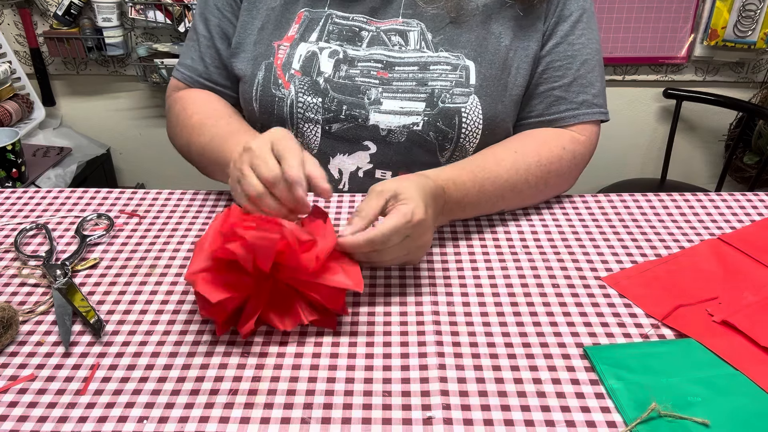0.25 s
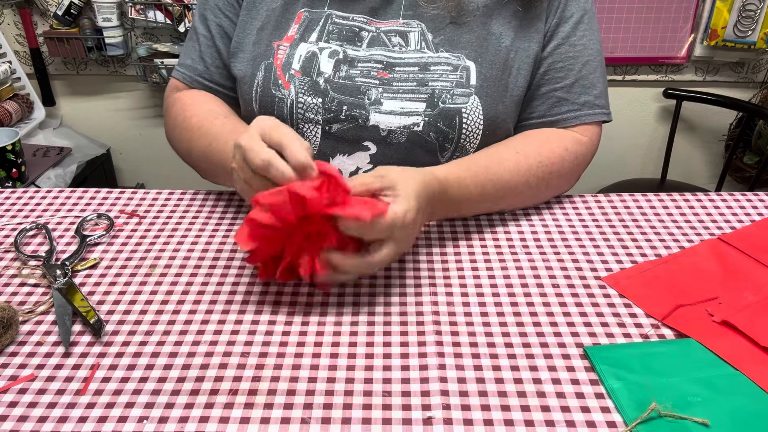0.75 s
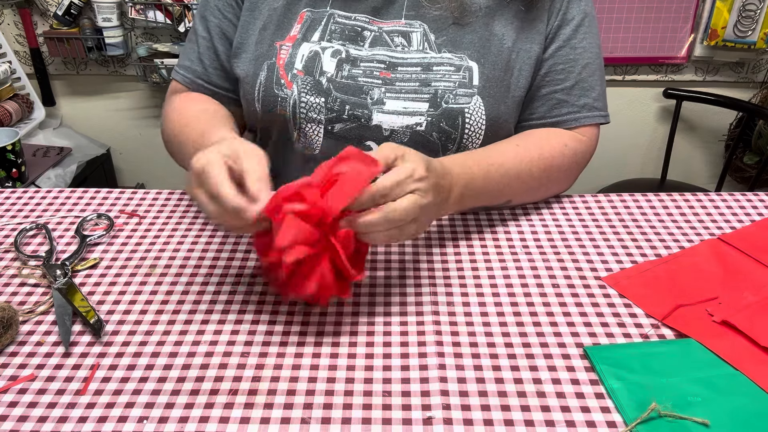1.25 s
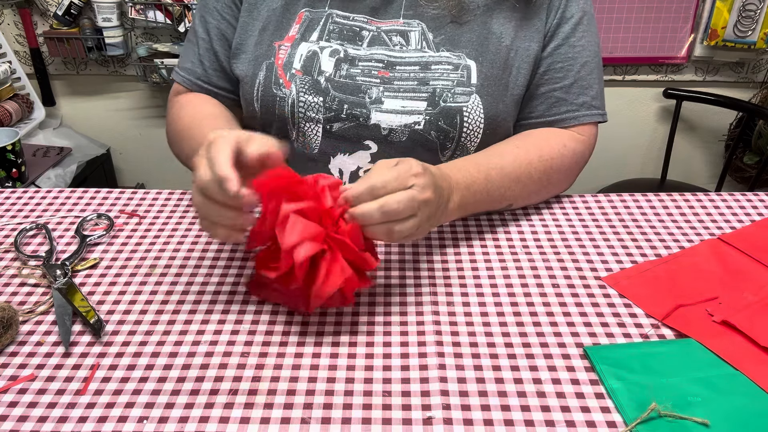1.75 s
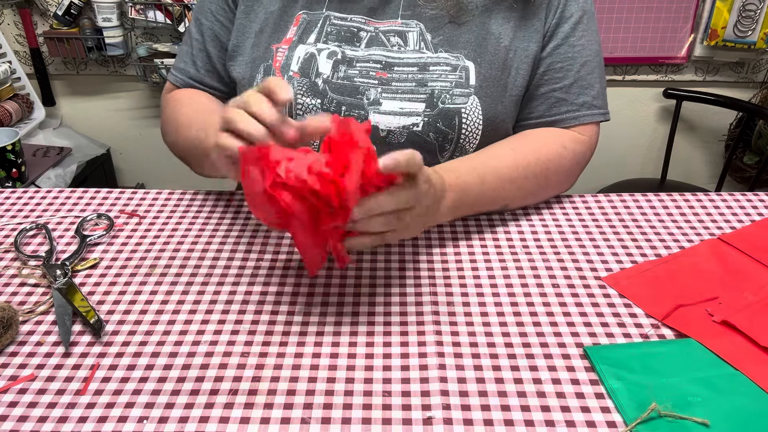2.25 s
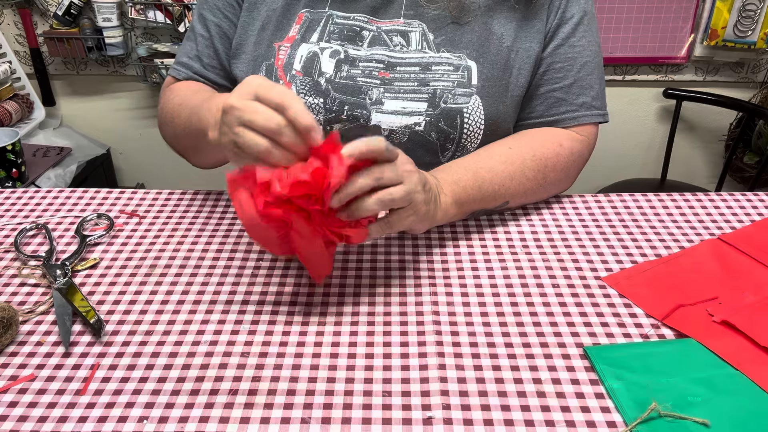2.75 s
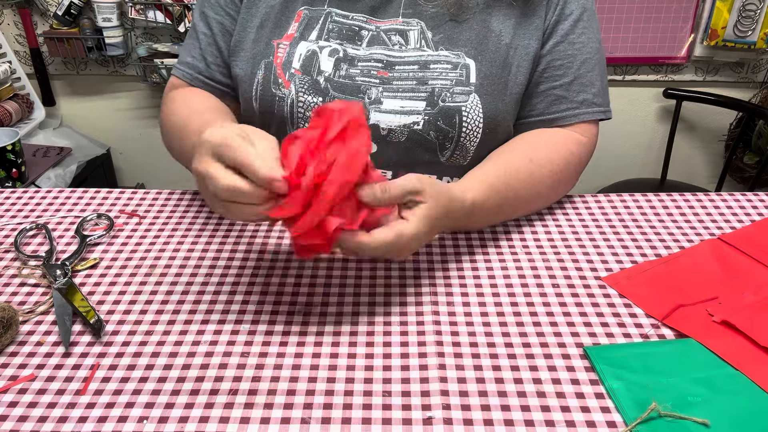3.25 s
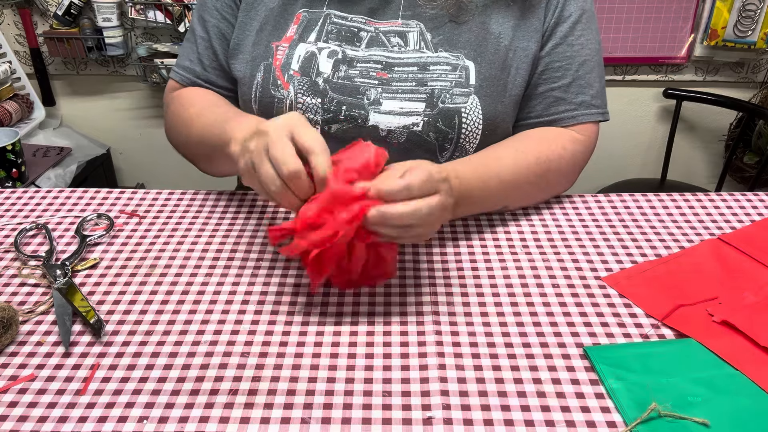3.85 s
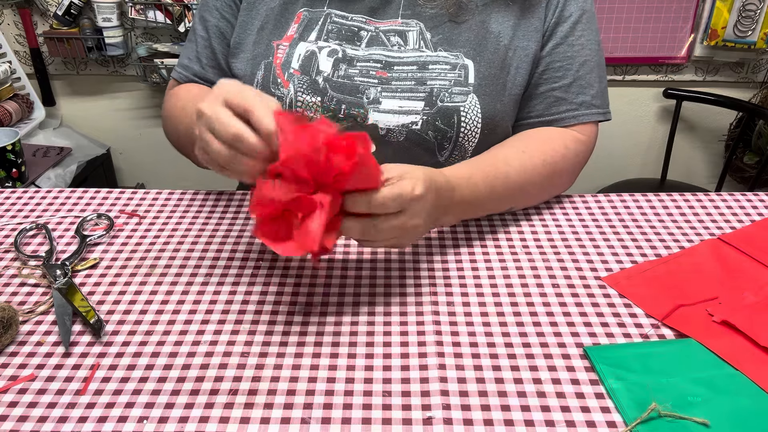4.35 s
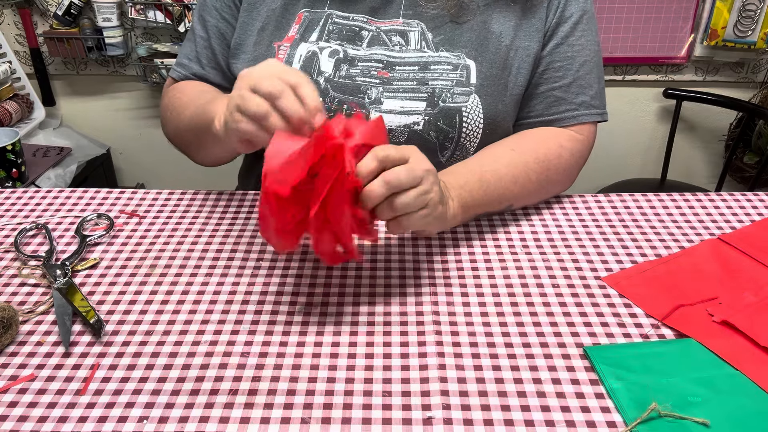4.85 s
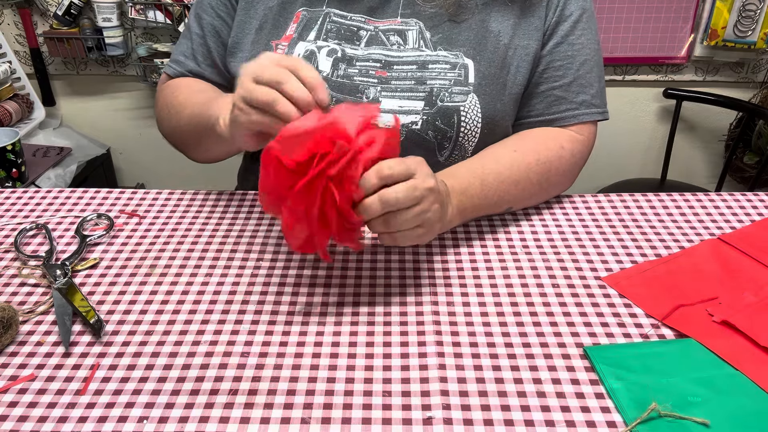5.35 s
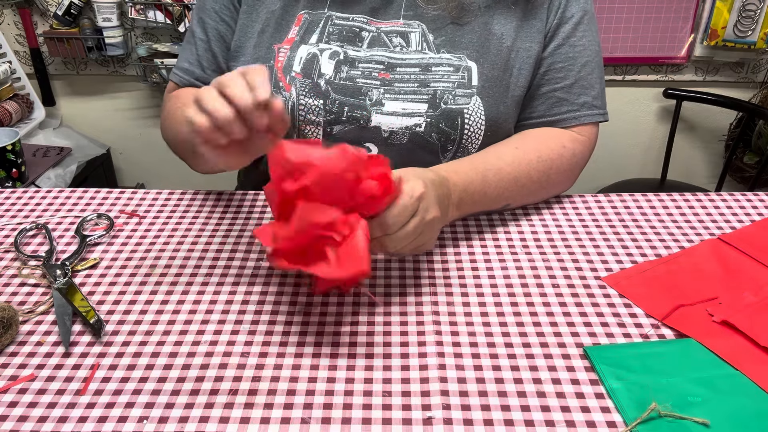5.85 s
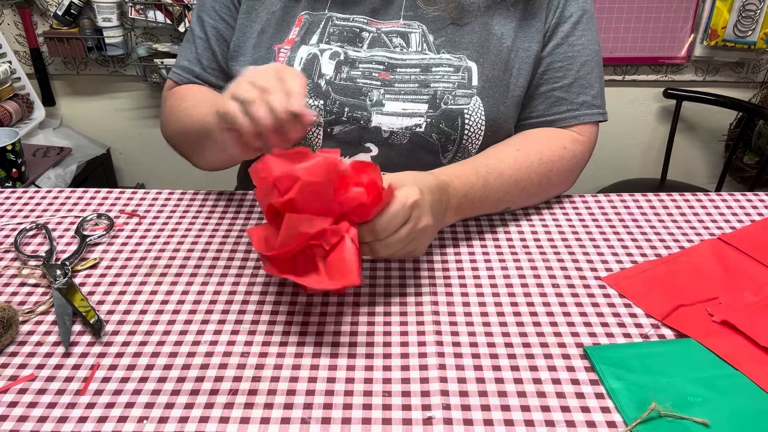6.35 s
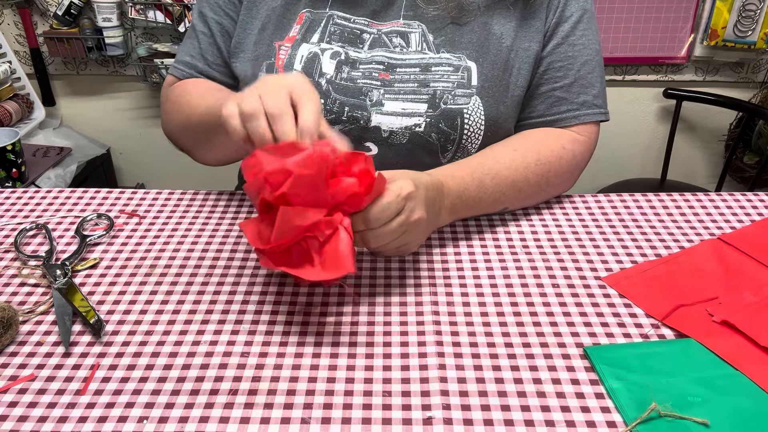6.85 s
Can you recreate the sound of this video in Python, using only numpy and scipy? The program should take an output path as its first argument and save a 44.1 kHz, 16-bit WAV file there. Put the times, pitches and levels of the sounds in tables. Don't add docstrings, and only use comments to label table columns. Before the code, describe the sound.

Close stereo sound of thin crisp plastic being scrunched and fluffed by hand. Short tugs and drags swell and slacken several times a second, bright and fizzy on top, papery and flapping below. Hard snaps cluster near one and a half to two seconds and again after five and a half. Quieter gaps follow near six seconds, then final rustles, over a low steady room rumble.

```python
import sys
import numpy as np
from scipy import signal
from scipy.fft import rfft, irfft, next_fast_len
from scipy.io import wavfile
from scipy.ndimage import uniform_filter1d

SR = 44100
rng = np.random.default_rng(int(sys.argv[2]) if len(sys.argv) > 2 else 0)


def volts(x):
    e = np.asarray(x, float) / 20
    return 10 ** e


def unload_audio(sound):
    columns = np.transpose(np.atleast_2d(sound))
    steps = np.round(np.clip(columns, -1, 1) * 32767)
    wavfile.write(sys.argv[1], SR, steps.astype(np.int16))


N = 313551
PAD = next_fast_len(N + SR // 2)
HZ = np.maximum(np.fft.rfftfreq(PAD, 1 / SR), 1)

# frequency in Hz, level in dB per Hz.
RUMBLE_COLOUR = [(15, -18), (30, -15), (48, 5), (65, 5.5), (85, -3), (120, -3.5), (160, -17.5),
                 (300, -22.5), (600, -48), (1200, -37), (2000, -45), (5400, -36), (9000, -42),
                 (16000, -33.5)]
# frequency in Hz, level in dB rms.
HUM_TONES = [(120.9, -71.5), (63.3, -79), (590, -84.5), (1160, -86), (5400, -91)]

# start in seconds, length in seconds, level in dB, brightness in dB.
DRAGS = [(0.009,0.11,-61,2.5), (0.159,0.069,-65,5.5), (0.581,0.23,-49,2.5), (0.887,0.021,-46.5,-0.5),
         (1.103,0.025,-52,-10), (1.331,0.034,-59.5,1), (1.469,0.051,-47,-1.5), (2.15,0.13,-66,2),
         (2.5,0.097,-75,3), (2.635,0.15,-47,-0.9), (3.209,0.14,-44,0), (3.374,0.12,-50,0),
         (3.742,0.11,-44,1.5), (3.874,0.37,-50.5,3), (4.049,0.017,-48,-1), (4.61,0.056,-63,2.5),
         (4.83,0.082,-51,-4), (4.75,0.054,-47.5,-2), (5.035,0.23,-68,-3), (5.218,0.16,-49,-4.5),
         (5.357,0.025,-50.5,6), (6.036,0.073,-53.5,-1), (6.087,0.097,-44,-4), (6.23,0.041,-53,0),
         (6.473,0.059,-48,-2.5), (6.562,0.11,-46.5,-4), (6.713,0.054,-55.5,-0.5), (6.994,0.066,-49,-2)]
# start in seconds, length in seconds, level in dB, brightness in dB.
GRABS = [
    (0.304, 0.13, -60.5, 3.5),
    (2.283, 0.052, -49, -0.5),
    (5.174, 0.04, -56, -0.5),
    (5.14, 0.03, -64, 2),
    (4.712, 0.03, -63, 3),
    (1.913, 0.016, -45, 3),
    (6.854, 0.04, -57, 0),
    (6.0, 0.02, -68, 3),
]
# peak time in seconds, rise in seconds, fall in seconds, peak level in dB, brightness in dB.
TUGS = [(0.45,0.17,0.46,-54,-2.5), (0.81,0.11,0.083,-43.5,0), (1.115,0.16,0.15,-47.5,1.5),
        (1.504,0.11,0.016,-52.5,4.5), (1.613,0.081,0.037,-40,-0.5), (1.733,0.17,0.048,-58.5,0),
        (1.856,0.071,0.084,-47,1.6), (1.96,0.095,0.024,-48.5,-0.5), (2.072,0.1,0.049,-45,1),
        (2.38,0.086,0.078,-45.5,-1.5), (2.621,0.076,0.045,-52.5,2.5), (2.932,0.18,0.01,-59.5,0),
        (2.988,0.063,0.074,-42.5,1), (3.095,0.038,0.062,-45.5,3.5), (3.64,0.21,0.22,-49,2),
        (4.353,0.081,0.11,-43.5,-1), (4.525,0.043,0.062,-51,3), (4.97,0.031,0.033,-45.5,-0.5),
        (5.613,0.0025,0.07,-49.5,-4), (5.656,0.022,0.044,-40.5,-5), (5.796,0.066,0.017,-53,2.5),
        (5.879,0.075,0.053,-65.5,-1.5), (6.35,0.037,0.039,-67,-8), (6.96,0.086,0.036,-41,-2),
        (0.27,0.03,0.025,-78.5,12), (0.965,0.011,0.032,-64,5), (1.42,0.03,0.03,-57,3),
        (2.83,0.018,0.05,-68,-6), (3.15,0.018,0.017,-57,-3), (3.75,0.052,0.023,-46.5,6),
        (3.805,0.05,0.035,-41.5,0.5), (4.29,0.015,0.03,-67,1), (4.85,0.03,0.058,-54.5,4),
        (5.56,0.11,0.026,-76.5,-3), (6.79,0.02,0.033,-65.5,-5), (6.905,0.03,0.02,-46,-2),
        (7.09,0.02,0.03,-64,-5)]
# time in seconds, flap level in dB against the crackle.
FOLDS_OVER_TIME = [(0, -8), (.3, -5.5), (.6, 1.5), (1, -2.5), (1.4, -4), (1.8, 0), (2.2, -5), (2.6, -2),
                   (3, -2.5), (3.4, -2), (3.9, -1.5), (4.4, -2.5), (4.798, -3), (5.301, -2), (5.7, -3.5),
                   (6.1, -5), (6.6, -7.5), (7.11, -1.5)]
# time in seconds, pleat level in dB against the crackle.
PLEATS_OVER_TIME = [(0, -16), (.32, -15), (.6, -10), (1.12, -6.5), (1.45, -12), (1.95, -10), (2.3, -10),
                    (2.7, -11), (3.17, -12), (3.66, -12.5), (4.1, -10), (4.55, -11), (5.0, -12.5),
                    (5.4, -14), (5.75, -11), (6.12, -8.5), (6.58, -8.5), (7.11, -10.5)]

# frequency in Hz, level in dB per Hz.
FLAP_COLOUR = [(110, -9), (200, -9.5), (330, -3), (540, 1), (800, -4), (1100, -4.5), (1800, -22.5)]
PLEAT_COLOUR = [(600, -26), (1000, -3.5), (1500, 1), (2100, -1.5), (2700, -8.5), (3500, -40)]
CRACKLE_COLOUR = [(500, -27), (1000, -15.5), (1500, -11.5), (2200, -6), (3000, 2), (4000, -1.5), (5200, -2),
                  (8000, -29.5)]
FIZZ_COLOUR = [(3000, -19), (4200, -9.5), (5200, -3.5), (6500, 2.5), (8000, 4.5), (10000, -2.5),
               (11500, -10), (14000, -8.5)]
SHEEN_COLOUR = [(8000, -16.5), (10500, 0), (12000, -6.5), (14000, 4), (15800, -2), (17000, -10)]

# time in seconds, peak in dB, pitch in Hz, wide crack in dB against the ring.
SNAPS = [(0.304, -57, 6150, 0), (0.3282, -40, 2950, -4), (0.4359, -34.5, 7200, -12),
         (0.7942, -32, 2980, -15), (1.276, -29.5, 3870, 2), (1.4656, -50, 2600, 6),
         (1.5542, -39, 2980, -10), (1.6105, -24.5, 3330, -21), (1.726, -46, 6020, 6),
         (1.7936, -30.5, 2580, 3), (1.913, -33, 8500, -23), (1.9533, -24.5, 1500, 1),
         (2.2835, -33.5, 4360, -1), (2.705, -36, 3020, -3), (2.9178, -38, 7320, -1.5),
         (3.0907, -41, 7630, -7), (3.2126, -44, 2660, 11), (3.648, -26.5, 7570, 7), (4.0402, -50, 3200, -4),
         (4.711, -45, 6300, -15), (0.786, -33, 3000, 3), (5.138, -39.5, 8800, -15), (5.369, -33, 3900, -6),
         (5.6186, -26, 3930, -6), (5.6512, -30, 4400, -9), (5.9993, -64, 7370, 2), (6.023, -35, 4420, 11),
         (6.0862, -46, 7400, 1), (6.47, -52, 2920, 7), (6.8553, -52, 1940, 8)]
# time in seconds, peak in dB, pitch in Hz.
TICKS = [(0.4743, -32, 3000), (1.5723, -26, 3130), (1.9118, -21, 8500), (3.157, -40, 7500),
         (4.2857, -33, 8170), (5.1736, -40, 4000), (5.2164, -33, 3300), (5.7448, -33, 2600),
         (6.3934, -50, 3000), (0.381, -36, 3600), (0.518, -41, 3300), (5.3128, -33, 3930),
         (6.34, -58, 2500), (6.4248, -58, 4000), (6.4377, -54, 3000), (6.508, -39, 7000),
         (0.3765, -42, 6910), (0.6255, -34, 6500), (0.9567, -42, 7900), (0.972, -43, 7000),
         (1.4726, -37, 8700), (1.506, -34, 2500), (1.6018, -29, 2820), (1.7774, -43, 2380),
         (1.8347, -36, 2950), (2.3196, -36, 2000), (2.365, -36, 2600), (2.487, -56, 5000),
         (2.9766, -31, 8090), (3.105, -30, 7600), (3.232, -31, 2800), (3.289, -32, 3500),
         (3.5838, -40, 4410), (3.7484, -26, 4270), (3.80, -28, 3300), (4.3415, -34, 3680),
         (4.537, -38, 4000), (4.9536, -39, 3580), (5.325, -37, 2300), (5.6082, -38, 2960),
         (5.691, -37, 2500), (5.926, -58, 7500), (6.128, -35, 2500), (6.157, -37, 3500), (6.561, -38, 2710),
         (6.762, -49, 5500), (6.908, -37, 2600), (7.02, -39, 3500), (1.905, -37, 4000), (1.9545, -27, 2200),
         (3.6491, -31, 3000), (1.62, -27, 1300), (6.96, -31, 2500), (0.3282, -40, 1500)]
# time in seconds, peak in dB, pitch in Hz, ring in cycles.
KNOCKS = [(0.57, -39, 214, 7), (0.553, -31, 226, 7.2), (0.625, -33, 395, 6.1), (0.853, -35, 580, 11),
          (1.038, -41, 420, 5.1), (1.27, -38.5, 686, 5.2), (1.466, -40.5, 910, 30), (1.572, -39, 990, 8),
          (1.615, -40, 180, 2.6), (1.615, -28, 453, 6.3), (1.794, -41.5, 380, 11), (1.913, -39.5, 377, 11),
          (1.95, -38.5, 370, 8.1), (2.319, -38.5, 730, 13), (2.37, -41, 560, 10), (2.775, -37.5, 522, 9.3),
          (2.991, -35, 550, 33), (3.093, -39, 940, 17), (3.225, -34, 970, 17), (0.81, -37, 420, 9.1),
          (3.898, -37.5, 650, 18), (3.957, -37.5, 506, 5.8), (4.35, -37.5, 706, 14), (4.753, -43, 480, 21),
          (5.214, -39, 580, 20), (5.387, -38.5, 547, 18), (5.619, -32.5, 510, 11), (5.653, -37, 360, 8.7),
          (0.6, -43, 450, 8), (6.902, -49, 460, 11), (0.473, -46, 525, 7.2), (0.514, -45, 999, 8),
          (0.582, -42, 330, 5.8), (0.674, -37, 1090, 10), (0.77, -42, 560, 8.4), (0.795, -36.5, 615, 7.8),
          (0.82, -37, 700, 14), (0.9, -40, 600, 8), (1.125, -39, 1120, 14), (1.504, -36.5, 554, 16),
          (1.723, -42.5, 418, 14), (1.955, -36.5, 1280, 11), (2.66, -42, 950, 10), (3.204, -44, 1130, 8),
          (3.323, -47, 533, 10), (4.05, -40, 600, 14), (5.338, -42, 573, 18), (5.365, -40, 520, 13),
          (6.255, -48, 600, 11), (7.085, -54, 407, 8)]

# frequency in Hz, lead in radians.
PORT_LEAD = [(60, 0), (450, -.45), (1800, -.2), (2300, -.3), (3000, -1), (4200, -1.4), (6000, -1.6),
             (7400, -.3), (8500, .3), (9700, 2.7), (11000, 3.4), (11900, 6), (13100, 6.55), (14500, 9),
             (15800, 9.6)]
# frequency in Hz, share from 0 to 1.
DIRECT_SHARE = [(60, .94), (300, .87), (1500, .85), (2300, .87), (3000, .68), (5000, .42), (6800, .65),
                (7600, .9), (10000, .92), (12500, .91), (15000, .88)]
# frequency in Hz, left over right in dB.
PORT_TILT = [(60, 1.5), (110, -2.5), (200, -1), (380, 0.5), (700, -1.5), (1290, -2.5), (2380, 1),
             (4400, -3), (8120, -2), (15000, 0.5)]

BAND_EDGES = np.r_[40:96:8, 96:144:12, 144, 160, 176, 196, 216, 240, 264, 292, 320:737:32]
# frequency in Hz, gap in dB.
WEAKER_GAP = [(1500, 15), (2300, 11), (4000, 8), (7000, 8), (9000, 7), (11500, 8), (14000, 7), (15500, 9)]
# frequency in Hz, level in dB against the band.
FAINT_LIMIT = [(800, -30), (1400, -8), (2000, -5.5), (2600, -4.8), (6000, -4.5), (7500, -6), (9000, -5.5),
               (11500, -5), (12500, -7), (15000, -6.5)]


def rms_one(x):
    return x / np.sqrt(np.mean(x ** 2) + 1e-20)


def at_hz(points, hz=HZ):
    points = np.array(points)
    return np.interp(np.log(hz), np.log(np.maximum(points[:, 0], 1)), points[:, 1])


def over_time(points):
    return np.interp(np.arange(N) / SR, *np.transpose(points))


def coloured(x, spectrum):
    bins = rfft(x, PAD)
    centres = np.geomspace(20, SR / 2, 60)
    band = np.searchsorted(centres, HZ).clip(0, len(centres) - 1)
    power = np.bincount(band, abs(bins) ** 2) / np.maximum(np.bincount(band), 1)
    flat = bins / np.sqrt(np.interp(np.log(HZ), np.log(centres), power) + 1e-12)
    one = rms_one(irfft(flat * volts(at_hz(spectrum)), PAD)[:N])
    return np.array([np.roll(one, k * N // 3) for k in range(3)])


def drift(rate):
    r = np.exp(-80 * np.pi * rate / SR)
    noise = rng.standard_normal(N // 40 + 2002)
    slow = signal.lfilter([1], [1, -2 * r, r * r], noise)[2000:]
    return np.interp(np.arange(N) / 40, np.arange(len(slow)), rms_one(slow))


def ring(clicks, hz, cycles):
    r = volts(-60 * hz / (cycles * SR))
    w = 2 * np.pi * hz / SR
    return signal.lfilter([0, np.sin(w)], [1, -2 * r * np.cos(w), r * r], clicks + 1e-18)


def room_tone():
    air_db = -61.53 + 0.42 * drift(15.0)
    air = volts(air_db) * coloured(rng.standard_normal(N), RUMBLE_COLOUR)
    t = np.arange(N) / SR
    hum = 0
    for hz, db in HUM_TONES:
        level = np.sqrt(2) * volts(db + 1.5 * drift(8.9))
        waver = 0.065 * np.sqrt(hz / 60) * drift(17)
        hum = hum + level * np.sin(2 * np.pi * hz * t + waver)
    return air + hum * np.array([[1], [1], [-1]])


def handling():
    attack_s, grab_attack_s, release_s = 0.09, 0.012, 0.13
    rest_db = -85
    shapes = []
    for rows, attack in ((DRAGS, attack_s), (GRABS, grab_attack_s)):
        for s, length, db, bright in rows:
            shapes.append(([s, s + length], [db, db - 3], bright, attack))
    for s, rise, fall, db, bright in TUGS:
        shapes.append(([s - abs(rise), s, s + fall], [db - 12.5, db, db - 9.5], bright, attack_s))

    t = np.arange(0, N + 32, 32) / SR
    power, weighted = volts(2 * rest_db), 0
    for times, levels, bright, attack in shapes:
        times = [times[0] - 2 * attack, *times, times[-1] + 2 * release_s]
        levels = [levels[0] - 120, *levels, levels[-1] - 120]
        part = volts(2 * np.interp(t, times, levels))
        power = power + part
        weighted = weighted + bright * part
    crackle_db = 10 * np.log10(power)
    return over_time([*zip(t, crackle_db)]), over_time([*zip(t, weighted / power)])


def buckles(per_s, clump_db, size_db, patchy_db, low_hz, high_hz, cycles, count):
    born = rng.random(N) < per_s * volts(clump_db * drift(35)) / SR
    strength = volts(size_db * np.minimum(rng.exponential(1, N), 3.6))
    clicks = strength * rng.choice([-1, 1], N) * born
    dealt = rng.integers(0, count, N)
    out = 0
    for k, hz in enumerate(np.geomspace(low_hz, high_hz, count)):
        come_and_go = volts(patchy_db * drift(10.0))
        out = out + ring(clicks * (dealt == k) * come_and_go, hz, cycles)
    return out


def rustle():
    crackle_db, bright_db = handling()
    small = buckles(7000, clump_db=2.5, size_db=3, patchy_db=3.6,
                    low_hz=900, high_hz=9500, cycles=24, count=22)
    tiny = buckles(12000, clump_db=1.5, size_db=2, patchy_db=3.5,
                   low_hz=7300, high_hz=15800, cycles=5.3, count=5)
    broad = buckles(1200, clump_db=2.5, size_db=0, patchy_db=-0.7,
                    low_hz=180, high_hz=1526, cycles=4.8, count=8)

    crackle = coloured(small, CRACKLE_COLOUR)
    pleats = volts(over_time(PLEATS_OVER_TIME)) * coloured(small, PLEAT_COLOUR)
    fizz = volts(1.05 * bright_db - 1.1) * coloured(small + 1.84 * tiny, FIZZ_COLOUR)
    sheen = volts(1.25 * bright_db + 2.0) * coloured(tiny, SHEEN_COLOUR)
    flap_db = over_time(FOLDS_OVER_TIME) - 0.21 * (crackle_db + 49)
    flap = volts(flap_db - 0.4) * coloured(broad, FLAP_COLOUR)

    jerks_db = 0.65 * drift(28) + 0.23 * drift(120)
    return volts(crackle_db + jerks_db - 2.0) * (crackle + pleats + fizz + sheen + flap)


def struck(events, slip_s, level_db, t60):
    span = SR // 10
    out = np.zeros((3, N + SR))
    age = np.arange(span) / SR
    for s, peak_db, hz, cycles, crack_db in events:
        push = rng.standard_normal(span) * age * np.exp(-2 * age / slip_s)
        crack = signal.lfilter([1, -2, 1], [1, -1.6, .64], push)
        body = np.diff(ring(push, hz, max(cycles, 2)), prepend=0)
        one = body / abs(body).max() + volts(crack_db) * crack / abs(crack).max()
        tails = rng.standard_normal((2, span)) * volts(-60 * age / t60)
        tails = tails / np.sqrt(np.sum(tails ** 2) / 2)
        echoes = signal.fftconvolve(tails, one[None], axes=1)[:, :span]
        gain = volts(peak_db + level_db) / (1 + volts(crack_db))
        at = round(s * SR)
        out[:, at:at + span] += gain * np.vstack([one, echoes])
    return out[:, :N]


def crease_snaps():
    events = [(s, db, hz, 5, crack_db) for s, db, hz, crack_db in SNAPS]
    return struck(events, slip_s=0.0013, level_db=3, t60=0.05)


def sharp_ticks():
    events = [(*row, 3, 0) for row in TICKS]
    return struck(events, slip_s=0.0003, level_db=7, t60=0.03)


def finger_knocks():
    events = [(*row, -22) for row in KNOCKS]
    return struck(events, slip_s=0.0056, level_db=-1.5, t60=0.24)


def ports(x):
    bins = rfft(x, PAD)
    share = np.clip(at_hz(DIRECT_SHARE), 0, 1)
    sign = np.array([[1], [-1]])
    direct = np.sqrt(share) * np.exp(.5j * sign * at_hz(PORT_LEAD)) * bins[0]
    scattered = np.sqrt(1 - share) * bins[1:]
    tilt = volts(.5 * sign * at_hz(PORT_TILT))
    return irfft((direct + scattered) * tilt, PAD)[:, :N]


def scene():
    bed = room_tone() + rustle()
    return ports(bed + crease_snaps() + sharp_ticks() + finger_knocks())


def thin_faint_lines(x, jump_db):
    hop, lead = 1024, 1024 - 42
    first = BAND_EDGES[0]
    n, line = np.arange(2 * hop) + .5, np.arange(BAND_EDGES[-1]) + .5
    window = np.sin(np.pi * n / (2 * hop))
    basis = window[:, None] * np.cos(np.pi / hop * np.outer(n + hop / 2, line))

    count = (N + lead) // hop + 2
    both = np.pad([x[0] + x[1], x[0] - x[1]], ((0, 0), (lead, count * hop - N - lead)))
    both = both.reshape(2, count, hop) / 2
    lines = np.concatenate([both[:, :-1], both[:, 1:]], axis=2) @ basis

    widths, band_hz = np.diff(BAND_EDGES), BAND_EDGES[:-1] * SR / (2 * hop)
    band_power = np.add.reduceat(lines ** 2, BAND_EDGES[:-1], axis=2) / widths
    level_db = 10 * np.log10(band_power + 1e-20)
    total_db = 10 * np.log10(np.sum(lines[..., BAND_EDGES[4]:] ** 2, axis=(0, 2)) + 1e-20)
    steady = (abs(np.diff(total_db, prepend=total_db[0])) < jump_db)[:, None]

    weak = (level_db[::-1] - level_db > at_hz(WEAKER_GAP, band_hz)) & steady
    least_db = (level_db.max(axis=0) + level_db) / 2 + at_hz(FAINT_LIMIT, band_hz)
    least = volts(least_db) * steady
    upper = lines[..., first:]
    patch = np.sqrt(uniform_filter1d(upper ** 2, size=3, axis=2).clip(0))
    heard = np.repeat(~weak, widths, axis=2) & (patch > np.repeat(least, widths, axis=2))
    lines[..., first:] = upper * heard

    frames = lines @ basis.T * 2 / hop
    joined = (frames[:, 1:, :hop] + frames[:, :-1, hop:]).reshape(2, -1)
    mid, side = [np.pad(v, (hop - lead, hop))[:N] for v in joined]
    return np.array([mid + side, mid - side])


def low_pass(x):
    return signal.sosfilt(signal.butter(12, 16500, fs=SR, output="sos"), x)


def record(dry):
    mix = thin_faint_lines(dry, jump_db=8)
    return low_pass(mix)


dry = scene()
out = record(dry)
unload_audio(out)
```